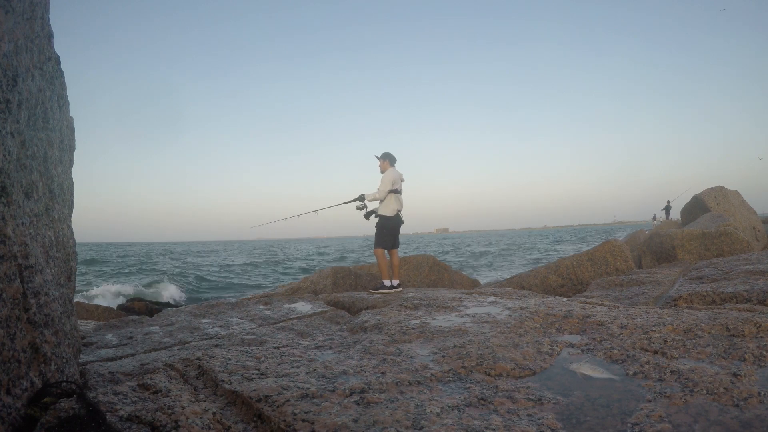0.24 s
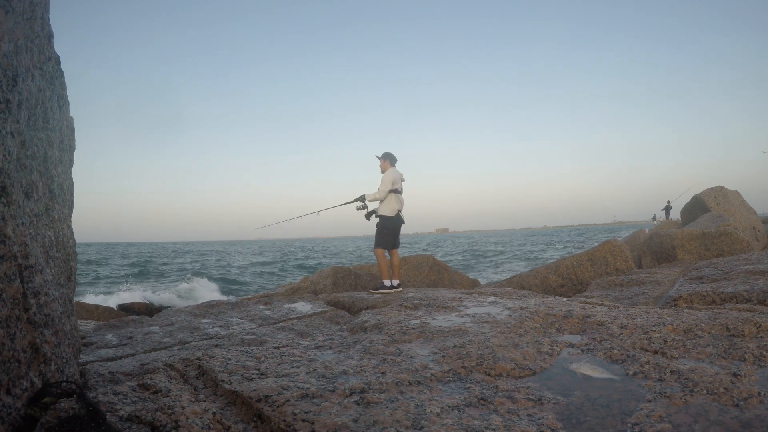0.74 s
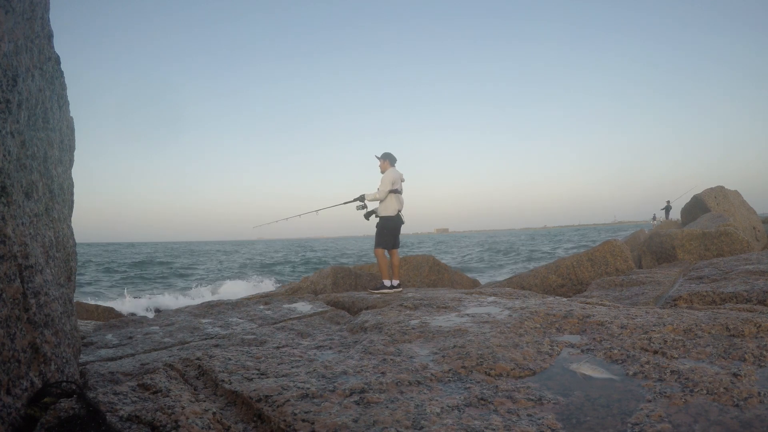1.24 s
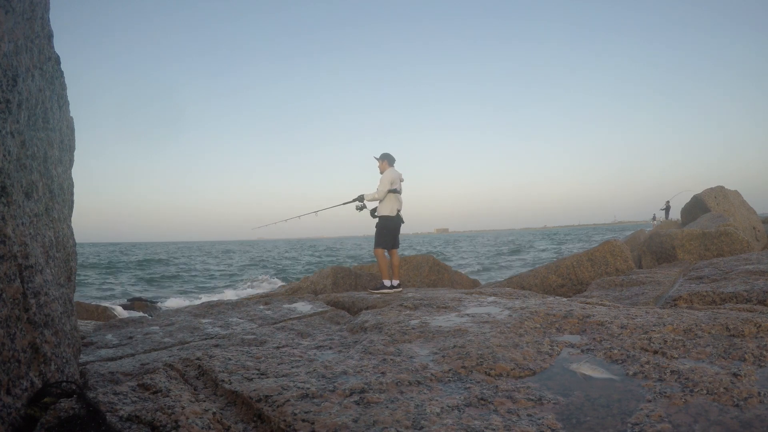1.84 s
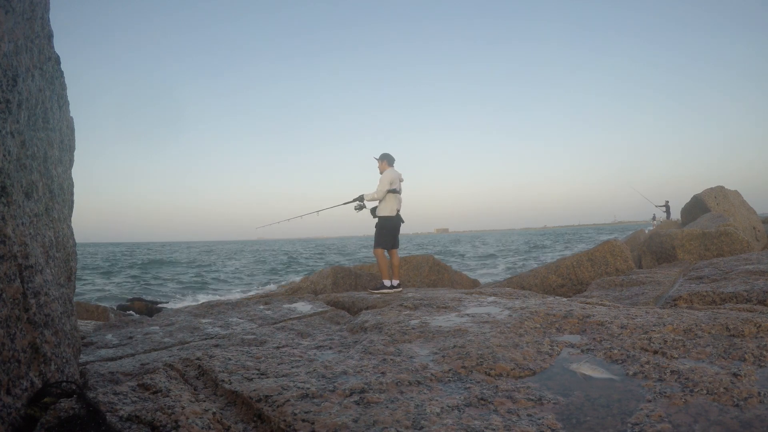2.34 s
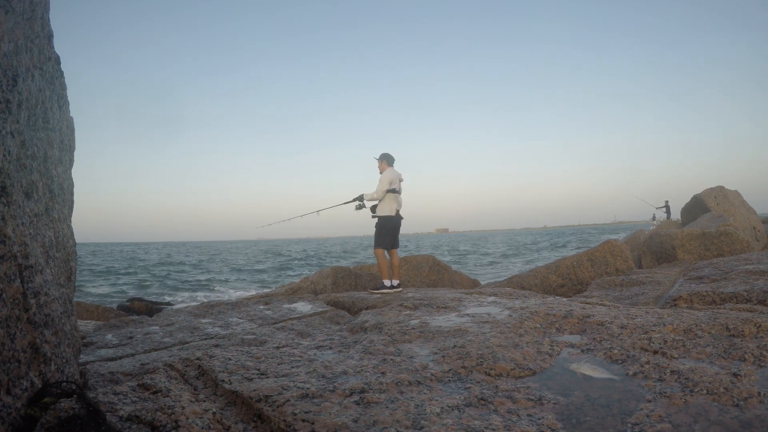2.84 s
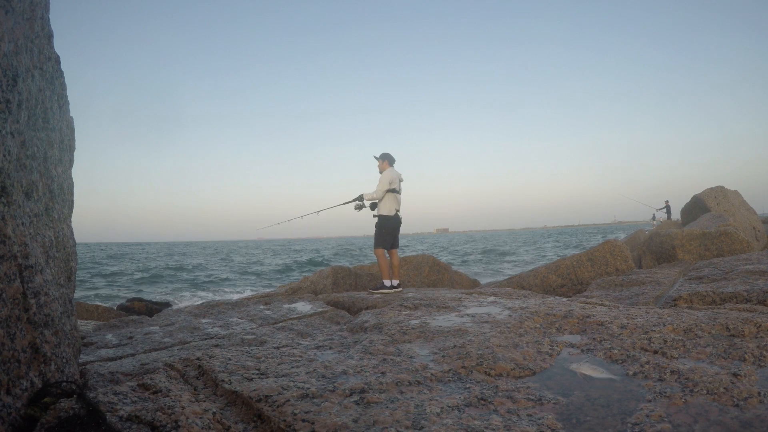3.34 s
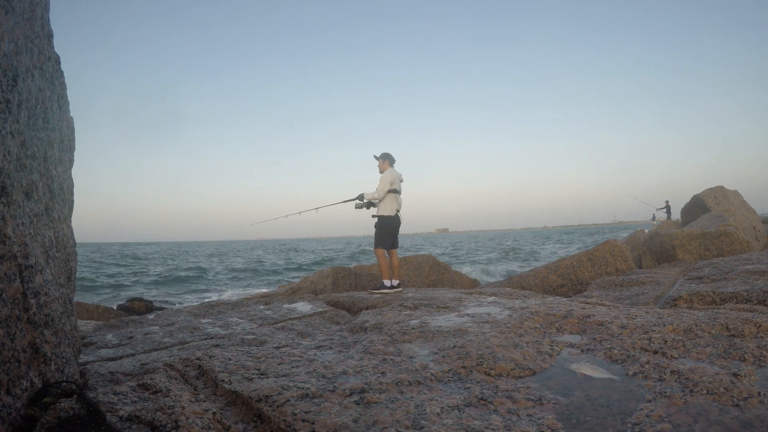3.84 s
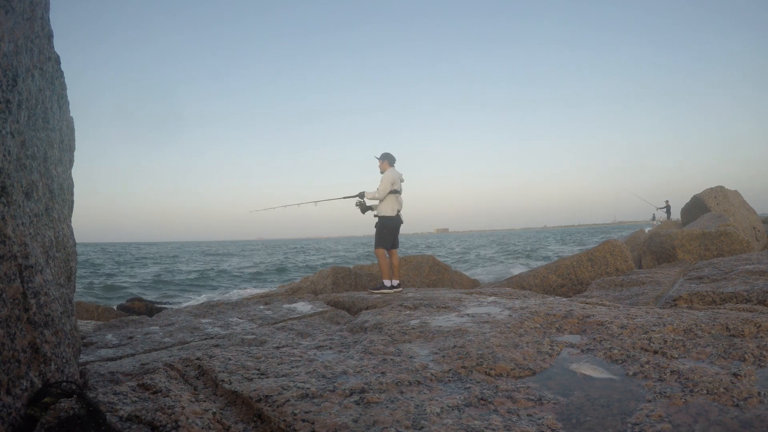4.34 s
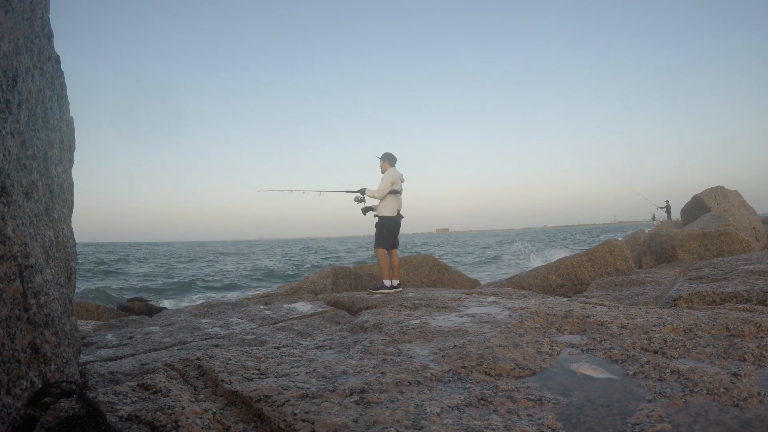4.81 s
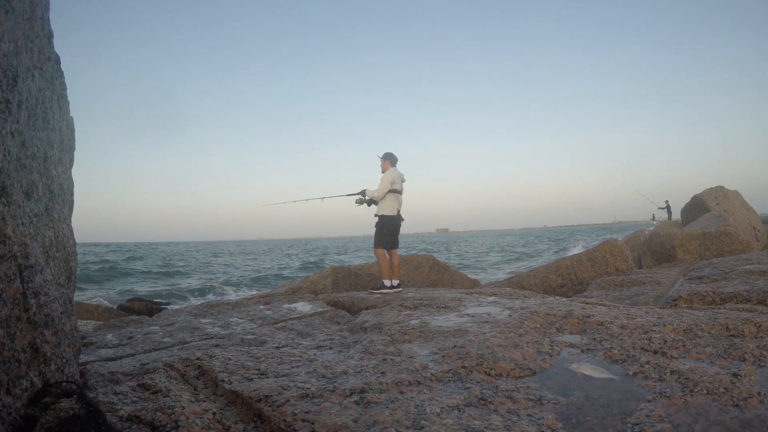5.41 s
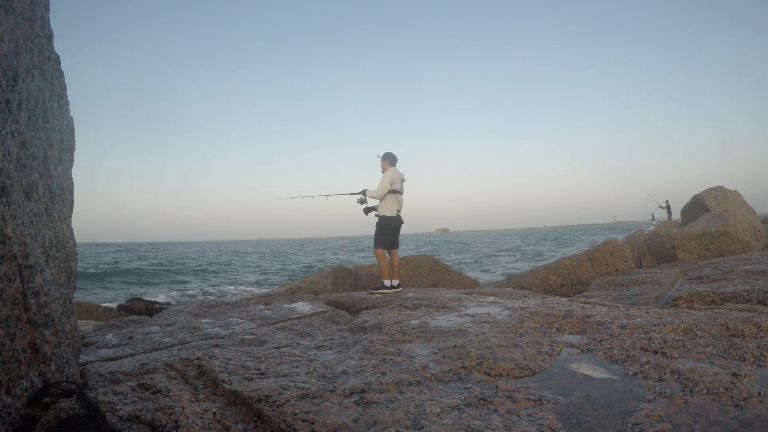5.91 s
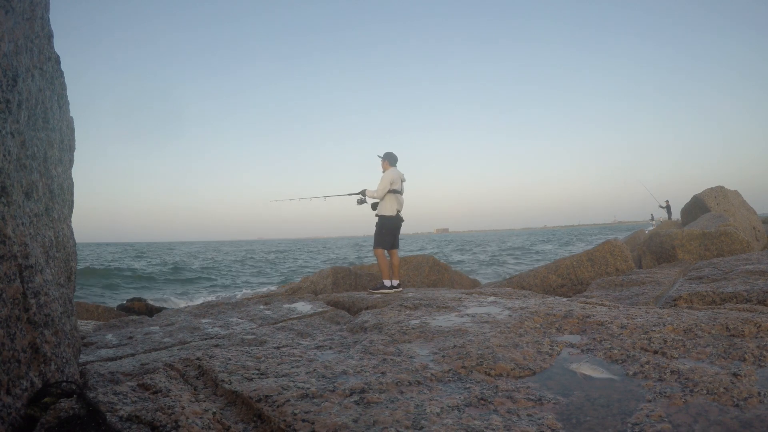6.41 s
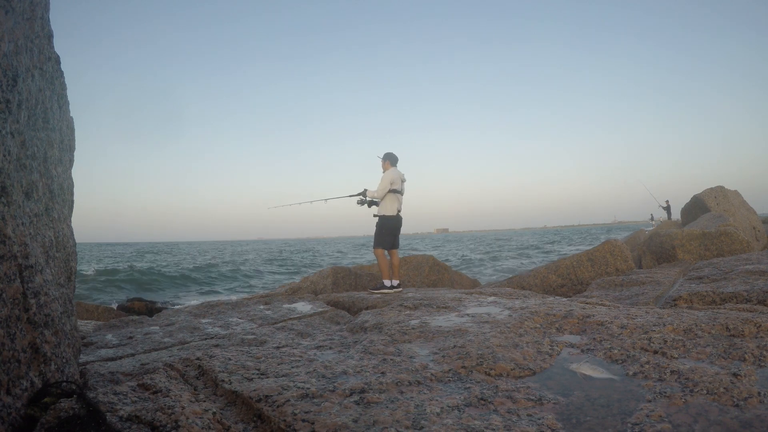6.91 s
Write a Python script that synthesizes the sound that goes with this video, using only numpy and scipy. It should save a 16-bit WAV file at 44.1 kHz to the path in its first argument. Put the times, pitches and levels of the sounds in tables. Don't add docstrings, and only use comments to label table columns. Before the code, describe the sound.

Gusty wind rumbles and flutters against the microphone while a wave slaps rock, fizzes into foam and drains, followed by smaller washes.

```python
import sys
import numpy as np
from scipy import signal
from scipy.fft import rfft, irfft, next_fast_len
from scipy.io import wavfile
from scipy.ndimage import uniform_filter1d, minimum_filter1d, map_coordinates

SR = 44100
rng = np.random.default_rng(int(sys.argv[2]) if len(sys.argv) > 2 else 0)


def gain_from_decibels(decibels):
    exponent = np.asarray(decibels, float) / 20
    return 10 ** exponent


def output_pcm(signal):
    pcm = np.clip(np.atleast_2d(signal).T, -1, 1) * 32767
    wavfile.write(sys.argv[1], SR, np.round(pcm).astype(np.int16))


N = 315627


def unit(x):
    return x / np.sqrt(np.mean(x ** 2) + 1e-20)


def along(points, hz):
    f, v = np.transpose(points)
    return np.interp(np.log(hz + 1), np.log(f + 1), v)


def curves(rows):
    s, *cols = np.transpose(rows)
    return [np.interp(np.arange(N) / SR, s, c) for c in cols]


def swells(times, sizes, half_s):
    t = np.arange(0, N + 64, 64) / SR
    bells = np.exp(-((t - np.c_[times]) / np.maximum(np.c_[half_s], .008)) ** 2)
    return np.interp(np.arange(N) / SR, t, sizes @ bells)


def wobble(rate):
    knots = rng.standard_normal(int(N * rate / SR) + 4)
    return map_coordinates(knots, [np.arange(N) * rate / SR])


def filtered(x, response):
    m = next_fast_len(N + 8192)
    return irfft(rfft(x, m) * response(np.fft.rfftfreq(m, 1 / SR)), m)[..., :N]


def panned(pair, pan_db):
    pair = pair / np.sqrt(np.mean(pair.mean(0) ** 2))
    return pair * gain_from_decibels(np.array([pan_db, -pan_db]) / 2)


def wind():
    # time in seconds, strength in dB, side L-R in dB, edge eddies above buffet in dB.
    wind_course = [(0, -21.5, 2.5, -6), (.3, -16.5, -1, -7), (.44, -26, 3, 2.5), (.7, -17.5, -6, -6),
                   (.86, -20.5, -2.5, 0), (1.6, -15.5, 1.5, -7), (2.2, -18.5, -1.5, -4.5),
                   (2.9, -17, 2, -6.5), (3.1, -19.5, 2, -12.5), (3.8, -16.5, 4.5, -13),
                   (4.22, -23.5, 5, -14), (4.62, -14.5, 0.5, -10.5), (5.05, -21.5, -0.5, -12),
                   (5.5, -16.5, 6, -11), (6.1, -17, 4.5, -9.5), (6.5, -16, 4, -9.5), (6.85, -18, 3.5, -7),
                   (7.16, -17, 9, -10)]
    # time in seconds, change in dB, side change in dB.
    gust_puffs = [(.32, 1.5, -1), (.72, 3, 1), (1.47, -4.5, 3), (1.77, 3.5, -8), (1.95, 1.5, 2),
                  (2.13, 3, -1), (2.17, -4.5, 3), (2.34, 3, 1.5), (2.47, 3.5, 2), (2.67, 2, 4),
                  (2.85, -0.5, -4.5), (2.96, 3.5, 7), (3.27, 5.5, -4), (3.33, -3, 10), (3.57, 4, -3.5),
                  (3.63, -6.5, 4), (3.83, 3.5, 6), (3.9, -4, -2), (4.05, 9, 4), (4.42, 0.5, 4.5),
                  (4.5, -2.5, 0), (4.78, 2, -2), (4.939, 5.5, 6), (5.2, 1, 4), (5.58, -1.5, -6),
                  (5.84, -2.5, 4.5), (6.08, 4, 1.5), (6.46, -3, 4), (6.76, -3.5, -1), (6.8, 3, 0)]
    # time in seconds, change in dB.
    eddy_bunches = [(.1, 0), (.36, 1), (.72, 4.5), (1.1, 5), (1.3, 1), (1.47, -2), (1.87, 5.5),
                    (2.137, 7.5), (2.37, 4), (2.65, 6.5), (2.78, 5), (2.9, 1), (3.27, 0.5), (3.57, 4.5),
                    (3.67, 2), (3.82, 2.5), (4.05, 3), (4.42, 0.5), (4.6, 4.5), (4.7, 1), (4.88, 2),
                    (5.06, 3), (5.28, 4.5), (5.56, 1), (5.9, 1.5), (6.22, 2.5), (6.46, 4.5), (6.7, 0),
                    (6.859, 8.5), (7.02, -1)]
    # frequency in Hz, density in dB per Hz.
    rumble_spectrum = [(8.8, -39), (15, -9), (43, 0.5), (87, 0), (168, -3.5), (300, -22), (358, -18.5),
                       (400, -28.5), (520, -36), (880, -120)]
    # frequency in Hz, density in dB per Hz.
    flutter_spectrum = [(100, -28), (200, 0.5), (260, 0.5), (400, -5.5), (600, -11), (1000, -21.5),
                        (2000, -54), (5000, -120)]
    # frequency in Hz, L-R in dB.
    lee_tilt = [(30, -4.5), (60, 1.5), (120, 2), (200, 5), (400, -3.5)]
    puff_half_s, bunch_half_s = 0.034, 0.023
    eddy_shared = 0.25
    eddy_follows, eddy_side = 0.28, .6
    eddy_wander_db = 4.5

    strength_db, side_db, eddy_db = curves(wind_course)
    s, db, lean_db = np.transpose(gust_puffs)
    puff_db = swells(s, db, [puff_half_s])
    pan_db = side_db + swells(s, lean_db, [puff_half_s])
    lumps = np.array([wobble(14), wobble(14)])

    def buffet(hz):
        return gain_from_decibels(along(rumble_spectrum, hz) + np.outer([.5, -.5], along(lee_tilt, hz)))

    rumble = gain_from_decibels(1.58 * lumps) * filtered(rng.standard_normal((2, N)), buffet)
    bunch_db = swells(*np.transpose(eddy_bunches), [bunch_half_s])
    eddies = filtered(rng.standard_normal((2, N)), lambda hz: gain_from_decibels(along(flutter_spectrum, hz)))
    flutter = gain_from_decibels(1.65 * lumps + 1.44 * wobble(30) + bunch_db) * eddies
    flutter = panned(flutter + eddy_shared * flutter[::-1], eddy_side * pan_db + eddy_wander_db * wobble(9))
    buffeting = gain_from_decibels(puff_db) * panned(rumble, pan_db - 1.5)
    fluttering = gain_from_decibels(eddy_db + eddy_follows * puff_db - 1.5) * flutter
    return gain_from_decibels(strength_db) * (buffeting + fluttering)


def patchy(depth_db, bins, frames):
    z = signal.stft(rng.standard_normal((2, N)), nperseg=512)[2]
    field = uniform_filter1d(rng.standard_normal(z.shape[1:]), bins, 0)
    field = uniform_filter1d(field, frames, 1)
    return signal.istft(z * gain_from_decibels(depth_db * unit(field)), nperseg=512)[1][:, :N]


def bubbles(centre_hz, spread, cycles, size_db, count):
    draw = rng.random((count, 3))
    hz = np.clip(centre_hz * np.exp(spread * rng.standard_normal((count, 1))), 600, 14000)
    k = np.arange(160)
    phase = hz * k / SR
    grain = np.sin(2 * np.pi * phase * (1 + .12 * phase / cycles))
    grain *= np.exp(-phase / cycles) * (1 - np.exp(-phase))
    grain *= gain_from_decibels(size_db * draw[:, :1]) * np.sqrt(hz)
    room = N + len(k)
    spot = (draw[:, 1:2] * N).astype(int) + k + (draw[:, 2:3] > .5) * room
    return unit(np.bincount(spot.ravel(), grain.ravel(), 2 * room).reshape(2, -1)[:, :N])


def at_ports(pair, spectrum):
    # frequency in Hz, coherence as a ratio.
    port_likeness = [(300, 0.99), (900, 0.21), (2000, 0.44), (3000, 0.48), (4100, 0.72), (4900, 0.17),
                     (6000, 0.2), (7500, 0.55), (9000, 0.38), (14000, 0.093)]
    # frequency in Hz, lead in radians.
    left_lead = [(300, 0), (1000, .6), (1800, .9), (4000, .2), (4800, -.3), (6000, -1.2), (7000, -2),
                 (8000, -2.5), (10000, -2.9)]
    # frequency in Hz, L-R in dB.
    port_tilt = [(150, 4), (380, -1.5), (940, -1), (2350, 0), (5870, -0.5), (9000, -2.5), (12000, 1.5),
                 (15000, 1)]

    def mixing(hz):
        angle = np.arccos(np.clip(along(port_likeness, hz), 0, 1)) / 2
        return np.array([np.cos(angle), np.sin(angle)])

    def port(hz, sign):
        gain = gain_from_decibels(along(spectrum, hz) + sign * along(port_tilt, hz) / 2)
        return gain * np.exp(.5j * sign * along(left_lead, hz))

    mid, side = filtered(pair, mixing)
    ports = np.array([mid + side, mid - side])
    return filtered(ports, lambda hz: np.array([port(hz, 1), port(hz, -1.07)]))


def surf():
    # time in seconds, flow in dB, foam above spray in dB, side L-R in dB.
    surf_course = [(0, -38, -2.5, -3), (.12, -37, -2.5, -8), (.56, -36.5, -3.5, 1), (.85, -32.5, -6.5, 1.5),
                   (1.2, -30, -6, -1), (1.6, -32, -2.5, -0.5), (1.9, -31, -1.5, -3), (2.2, -30, -1.5, -3.5),
                   (2.82, -31.5, -0.5, -4), (3.3, -35.5, 0.5, -4.5), (3.65, -38.5, -1, -4.5),
                   (4.35, -39, -1.5, 0), (4.62, -37.5, -1.5, -1), (4.97, -42, -0.5, -1),
                   (5.42, -37.5, -1, -1), (6.15, -40.5, -3, 0), (6.55, -38, -3.5, -1.5),
                   (7.16, -39.5, -4.5, -1.5)]
    # time in seconds, change in dB, brightness in dB,
    # half length in seconds.
    water_surges = [(0.635, 2, 0.5, .05), (0.723, 1.5, -1.5, 0.045), (0.942, 2.5, 0.5, 0.045),
                    (1.099, 5.5, -4, 0.014), (1.213, -0.5, 2, 0.033), (1.597, -2, 0, 0.036),
                    (1.7, 3.5, -1, 0.044), (1.836, 0, -3, .04), (2.053, 6.5, -2.5, 0.049),
                    (2.106, -1, -2, .03), (2.203, 1, 0, .04), (2.31, -2.5, 0, 0.049), (2.366, 5.5, -1, .03),
                    (2.42, -2.5, 1.5, .03), (2.565, 1.5, 0, 0.027), (2.64, 2, 0, .03),
                    (3.305, 2, -1.5, 0.045), (3.41, -1, -1, .03), (3.462, 2.5, 0.5, 0.037),
                    (3.825, 1, 1, .04), (4.044, 1.5, 0, .05), (3.634, 0.5, 3, 0.023),
                    (4.476, 4.5, 1, 0.019), (4.595, 2, -1, 0.046), (4.676, -0.5, 2, 0.024),
                    (5.302, 1.5, -0.5, 0.1), (5.47, 1.5, -0.5, 0.033), (6.22, 4.5, -2, 0.022),
                    (6.48, 4.5, -5, 0.058), (6.953, 2.5, 2, 0.031), (7.115, 3.5, 3, 0.046)]
    # frequency in Hz, density in dB per Hz.
    wash_spectrum = [(200, -29), (400, -0.5), (700, -6), (1200, -8.5), (1900, -13), (2600, -21),
                     (4000, -35), (8000, -120)]
    # frequency in Hz, density in dB per Hz.
    spray_spectrum = [(1200, -28), (2000, -0.5), (2600, -0.5), (3200, -1), (4100, -2.5), (4900, -6.5),
                      (5800, -8), (8000, -40), (14000, -120)]
    # frequency in Hz, density in dB per Hz.
    fizz_spectrum = [(3000, -30), (4800, -9), (6000, -1), (6800, 1), (7500, -1), (8300, -8), (9800, -13),
                     (11000, -17), (12200, -17), (13200, -20.5), (14200, -25), (15200, -31)]
    flow_ref_db, spray_over_wash_db = -38, -9
    spray_grows, foam_follows = 1.18, 0.84

    flow_db, foam_db, pan_db = curves(surf_course)
    s, db, bright_db, half_s = np.transpose(water_surges)
    surge_db, bright_db = swells(s, db, half_s), swells(s, bright_db, half_s)
    spray_db = flow_ref_db + spray_over_wash_db + spray_grows * (flow_db - flow_ref_db) + bright_db
    slosh_db = 0.16 * wobble(18) + 0.55 * wobble(45)

    water = patchy(1.7, bins=3, frames=8)
    water = water + gain_from_decibels(-16) * bubbles(1300, .5, 3, size_db=8, count=6000)
    drops = patchy(0.83, bins=10, frames=8)
    drops = drops + gain_from_decibels(-14.0) * bubbles(3530, 0.293, 1.87, size_db=6, count=6000)
    foam = patchy(0.94, bins=10, frames=8)
    foam = foam + gain_from_decibels(-11.5) * bubbles(6830, 0.307, 1.35, size_db=17, count=9000)

    wash = gain_from_decibels(flow_db + surge_db + 2.5) * panned(at_ports(water, wash_spectrum), pan_db)
    spray = gain_from_decibels(spray_db + surge_db) * panned(at_ports(drops, spray_spectrum), 0.78 * pan_db)
    fizz_db = spray_db + foam_db + foam_follows * surge_db + 0.85
    fizz = gain_from_decibels(fizz_db) * panned(at_ports(foam, fizz_spectrum), 0.86 * pan_db)
    return gain_from_decibels(slosh_db) * (wash + spray + fizz)


def slaps():
    # start in seconds, peak in dB, treble in dB, 60 dB decay time in seconds.
    rock_strikes = [(0.619, -18, -15, 0.12), (0.719, -14, -17, 0.13), (0.894, -14, -18, 0.13),
                    (1.097, -11.5, -15, 0.14), (1.699, -18, -14, 0.13), (2.039, -12, -10, 0.1),
                    (2.129, -27, -15, 0.12), (2.346, -9, -19, 0.17), (2.619, -18, -14, 0.12),
                    (2.72, -17, -15, .1), (2.77, -21, -15, .1), (2.846, -16.5, -7, 0.14),
                    (3.483, -28, -15, 0.12), (4.467, -29, -15, 0.13), (4.909, -23.5, -9, 0.12),
                    (6.212, -27, -20, 0.12), (6.449, -20, -22, 0.12), (6.848, -32, -20, 0.1),
                    (6.939, -25, -16, 0.089), (7.089, -23, -15, 0.12)]
    # frequency in Hz, density in dB per Hz.
    thump_spectrum = [(150, -18), (300, 0), (700, -5.5), (1400, -5.5), (2000, -19), (3500, -31),
                      (9000, -120)]
    # frequency in Hz, density in dB per Hz.
    splash_spectrum = [(1500, -21), (3000, 0), (5000, -4), (6800, -2), (10000, -12), (12000, -27),
                       (15000, -47)]
    body, treble = np.zeros(N + SR), np.zeros(N + SR)
    t = np.arange(SR // 2) / SR
    for s, db, treble_db, t60 in rock_strikes:
        shape = (1 - np.exp(-t / 0.006)) * gain_from_decibels(-60 * t / max(t60, .03))
        body[round(s * SR):][:len(t)] += gain_from_decibels(db - 7.5) * shape
        treble[round(s * SR):][:len(t)] += gain_from_decibels(db + treble_db - 6) * shape
    thump = unit(at_ports(rng.standard_normal((2, N)), thump_spectrum))
    splash = unit(at_ports(rng.standard_normal((2, N)), splash_spectrum))
    return (body[:N] * thump + treble[:N] * splash) * gain_from_decibels([[-1.5], [1.5]])


def scene():
    return surf() + wind() + slaps()


def limited(x, top):
    need = np.minimum(1, top / (np.abs(x).max(0) + 1e-9))
    return x * uniform_filter1d(minimum_filter1d(need, size=900), size=450)


def thinned(x, lag):
    # frequency in Hz, bar in dB.
    treble_bar = [(7800, -40), (8800, -16), (10000, -12.5), (11000, -11), (12200, -11.5), (13200, -15),
                  (14200, -20.5), (15200, -25)]
    padded = np.pad(x, [(0, 0), (lag, 4096)], "reflect")
    hz, _, z = signal.stft(padded, SR, "cosine", nperseg=2048)
    fizz_band = z[:, (hz > 6000) & (hz < 7500)]
    fizz = np.sqrt(np.mean(np.abs(fizz_band) ** 2, axis=(0, 1)))
    bar = fizz ** 1.2 / fizz.max() ** .2
    z *= np.abs(z) > gain_from_decibels(along(treble_bar, hz))[:, None] * bar
    z *= (np.abs(z) > gain_from_decibels(-30) * fizz.max()) | (hz < 12900)[:, None]
    return signal.istft(z, SR, "cosine", nperseg=2048)[1][:, lag:lag + N]


def top_cut(x):
    return signal.sosfilt(signal.butter(12, 15270, fs=SR, output="sos"), x)


def record(dry):
    # time in seconds, stereo difference in dB.
    stereo_opening = [(0, -40), (.58, -41), (.7, -16), (.85, -11), (1.05, -6), (1.9, -1), (7.2, 1)]
    # frequency in Hz, gain in dB.
    summed_colour = [(200, 2), (3000, -1.5), (5000, 3.5), (6000, -0.5), (7000, -7.5), (9000, -2),
                     (11000, -1), (13000, -3)]
    # frequency in Hz, density in dB per Hz.
    hiss_spectrum = [(1500, 8.5), (5000, 5), (7500, -3), (10500, -5), (12000, -5), (14000, -4),
                     (15200, -10)]
    width = gain_from_decibels(curves(stereo_opening)[0])
    mid, side = (dry[0] + dry[1]) / 2, (dry[0] - dry[1]) / 2
    coloured = filtered(mid, lambda hz: gain_from_decibels(along(summed_colour, hz)))
    mid = width * mid + (1 - width) * coloured
    x = limited(np.array([mid + width * side, mid - width * side]), 0.83)
    hiss = unit(filtered(rng.standard_normal((2, N)), lambda hz: gain_from_decibels(along(hiss_spectrum, hz))))
    hiss = gain_from_decibels(-53.0) * (1 - width) * hiss
    closing = np.clip((N - np.arange(N)) / (.0015 * SR), 0, 1)
    return top_cut(closing * (thinned(x, lag=345) + hiss))


dry = scene()
out = record(dry)
output_pcm(out)
```